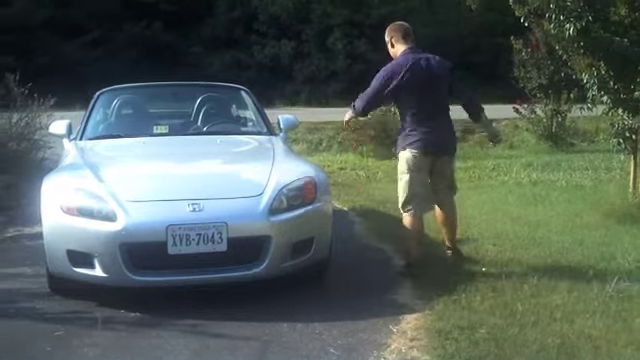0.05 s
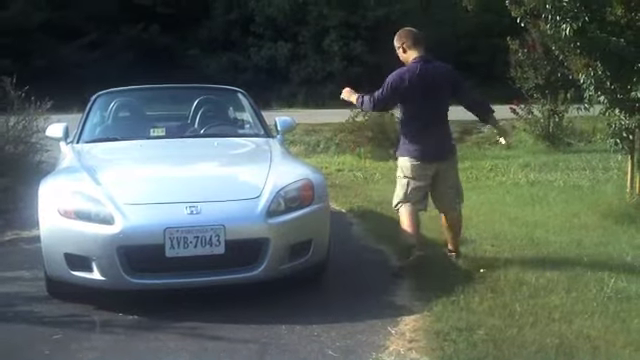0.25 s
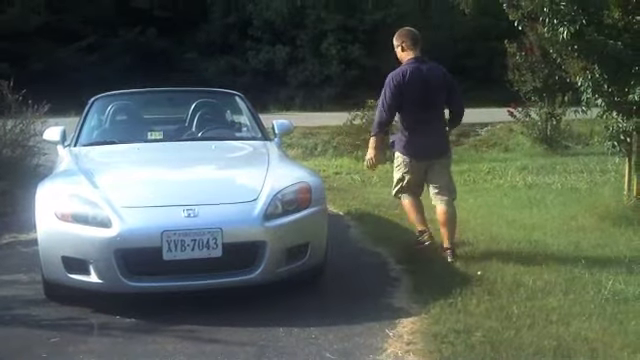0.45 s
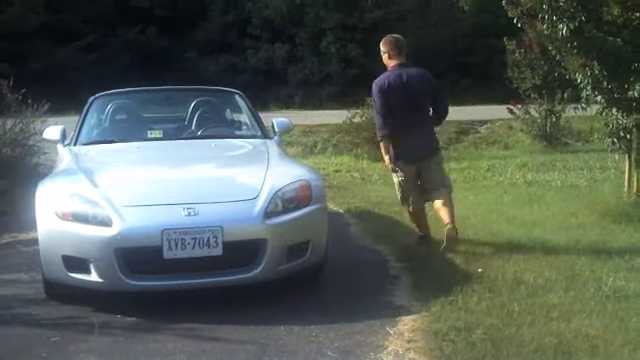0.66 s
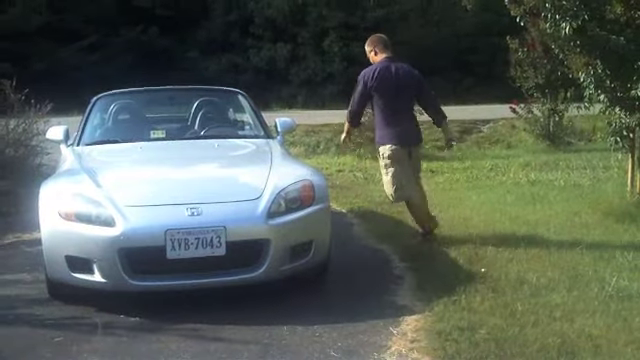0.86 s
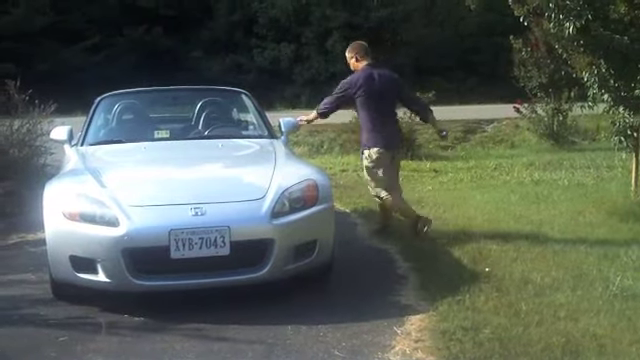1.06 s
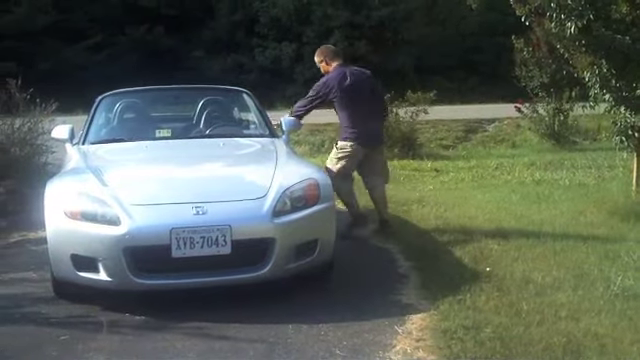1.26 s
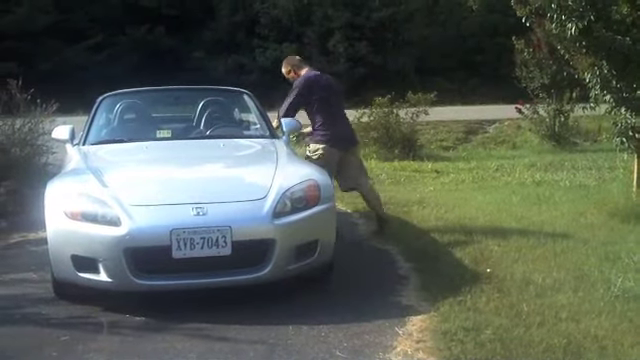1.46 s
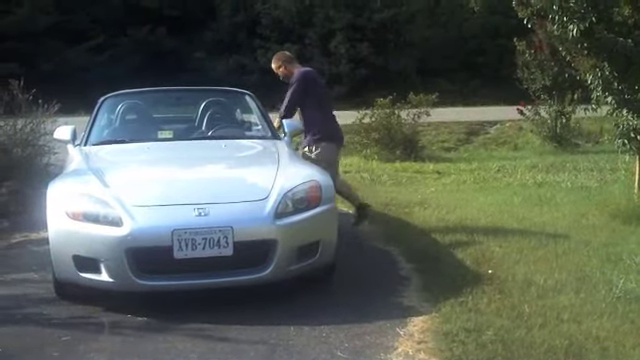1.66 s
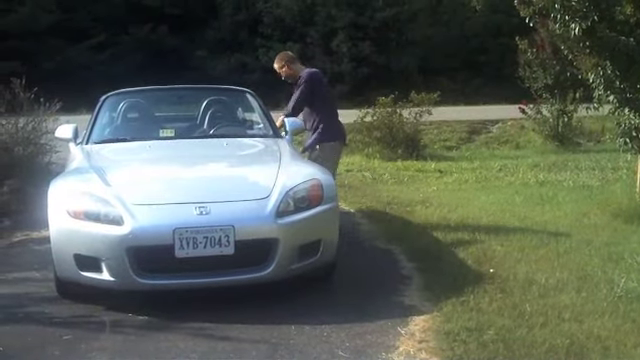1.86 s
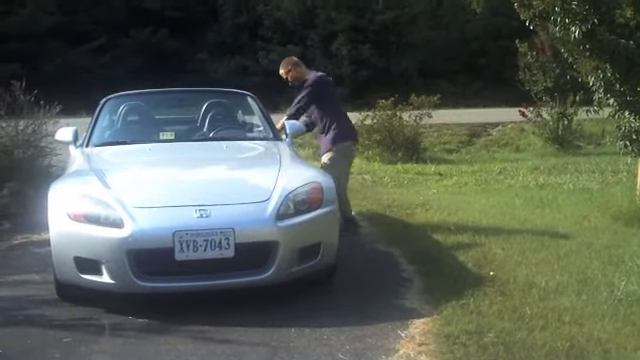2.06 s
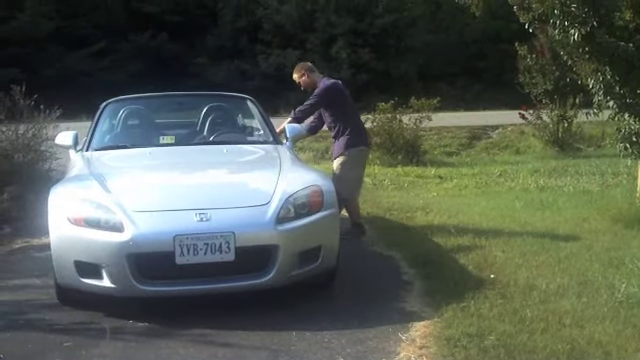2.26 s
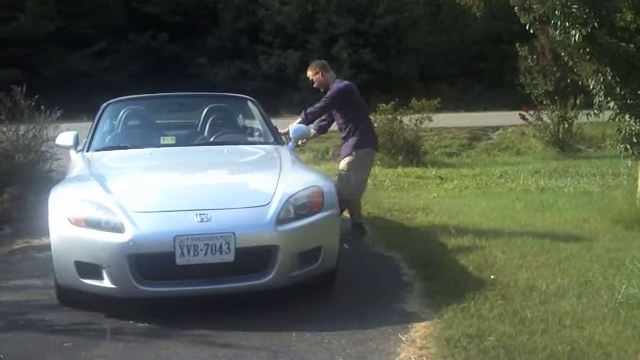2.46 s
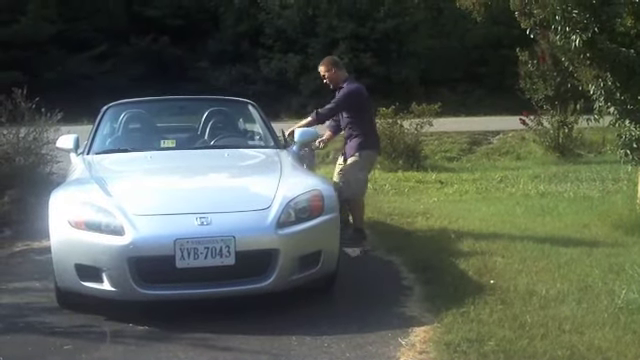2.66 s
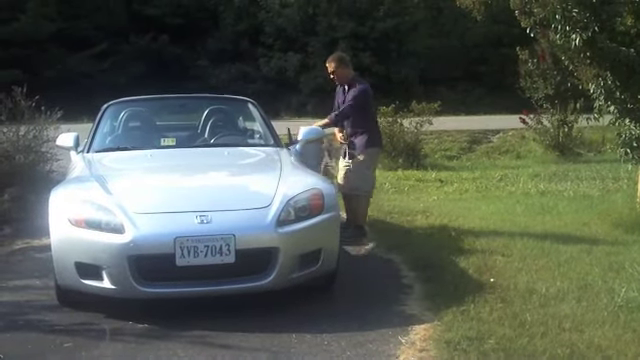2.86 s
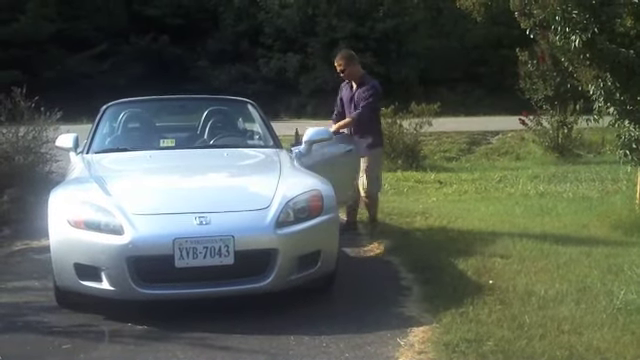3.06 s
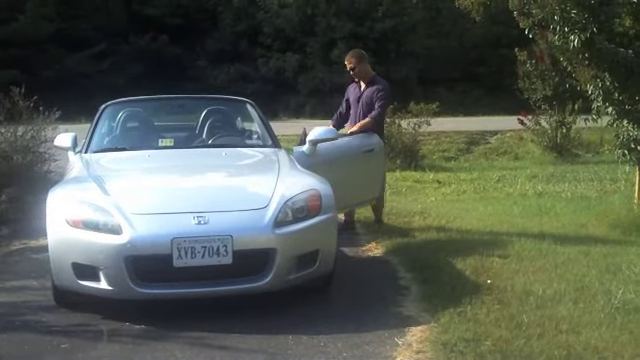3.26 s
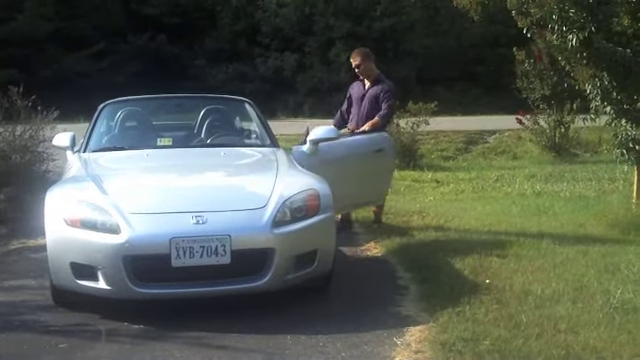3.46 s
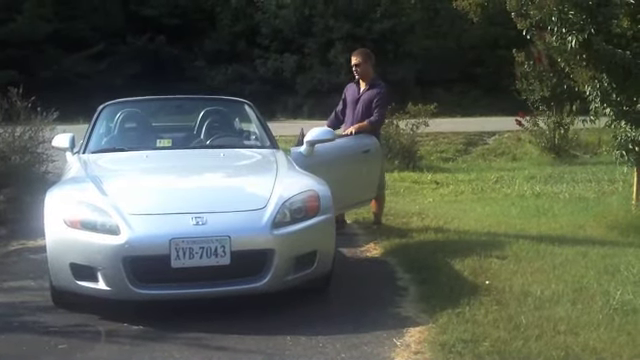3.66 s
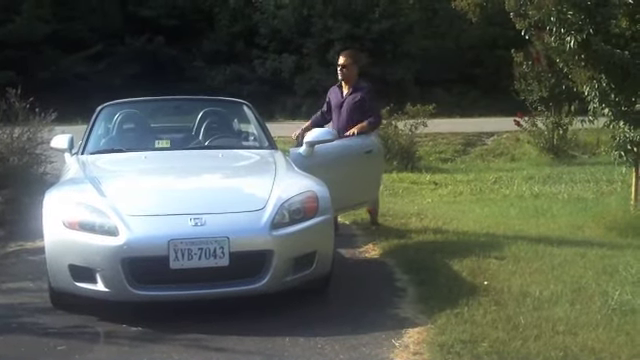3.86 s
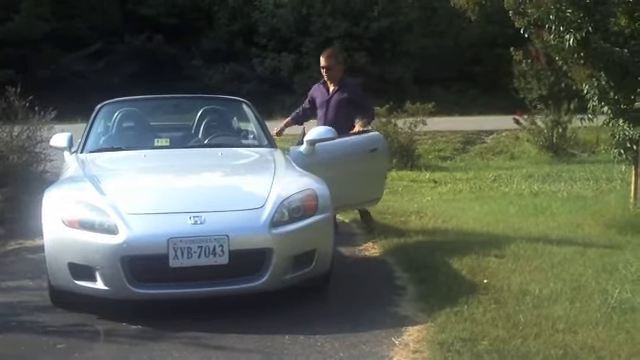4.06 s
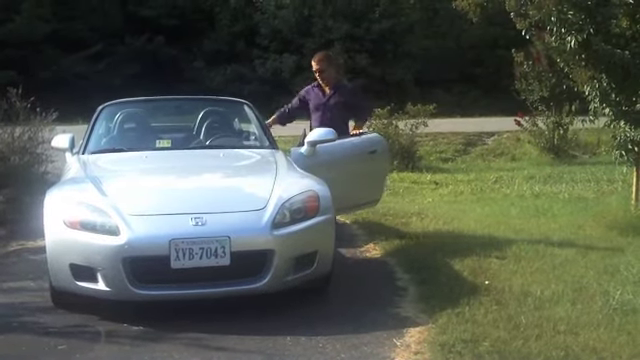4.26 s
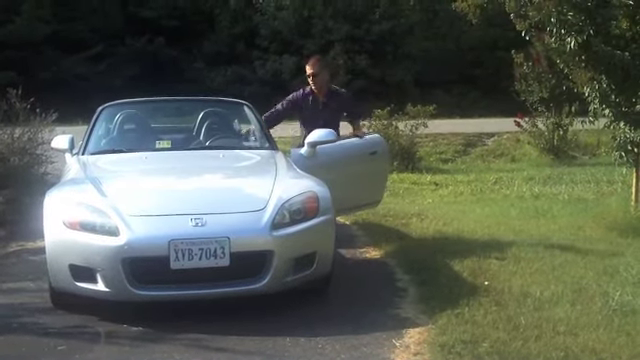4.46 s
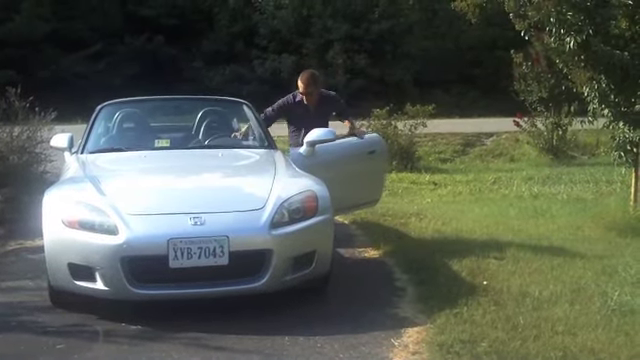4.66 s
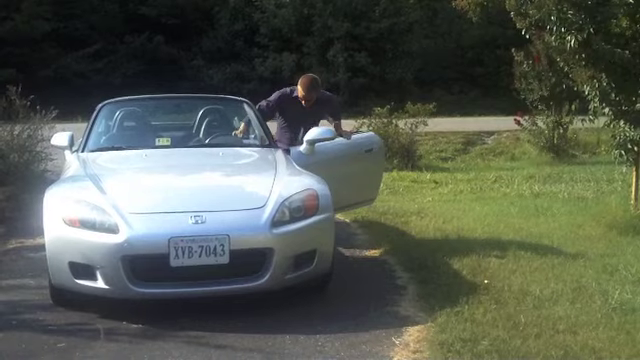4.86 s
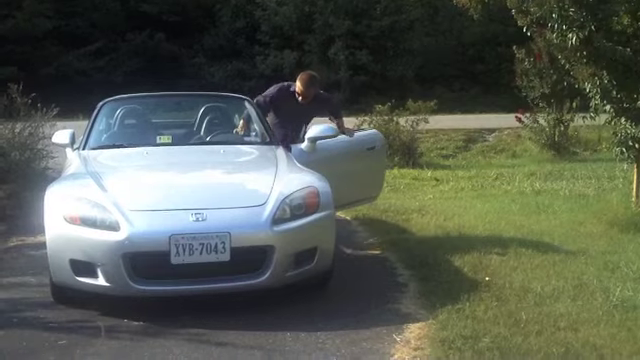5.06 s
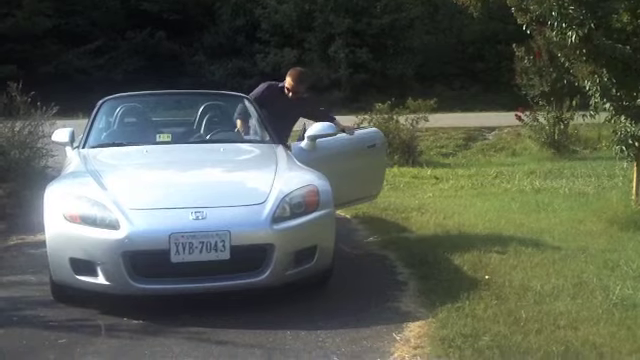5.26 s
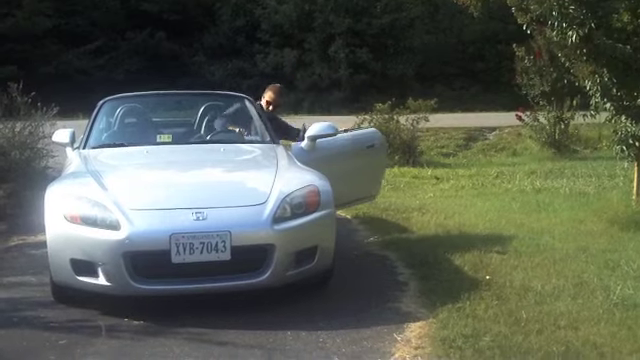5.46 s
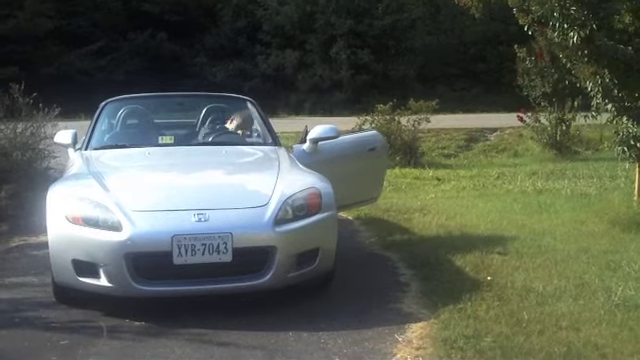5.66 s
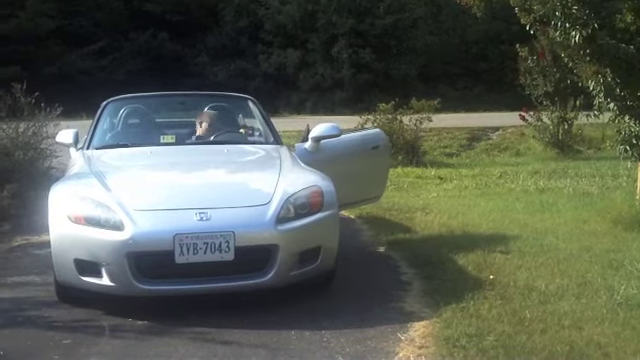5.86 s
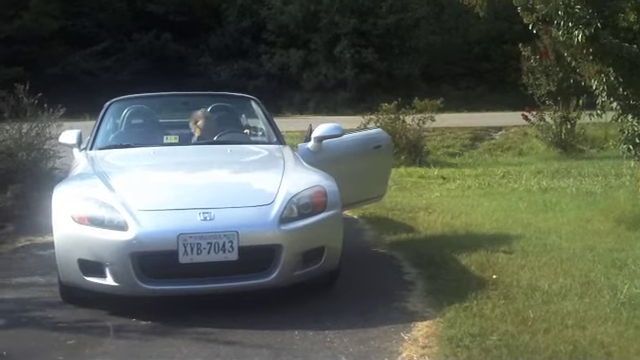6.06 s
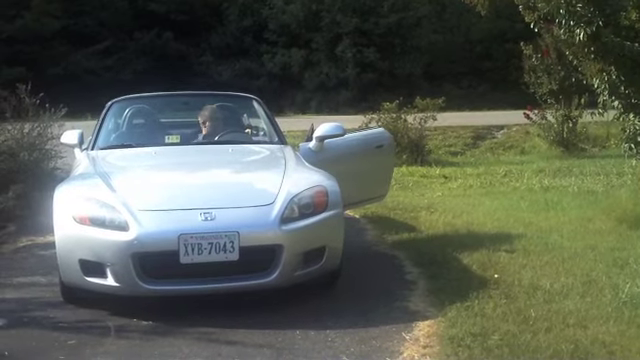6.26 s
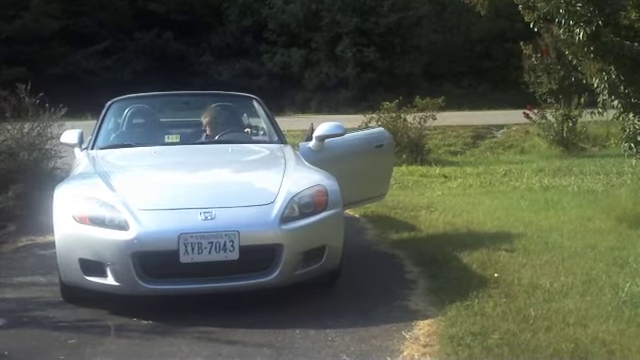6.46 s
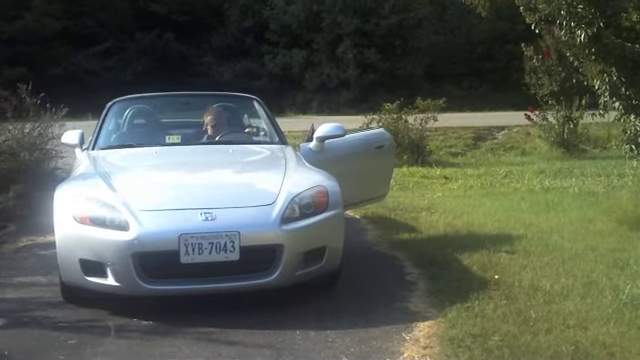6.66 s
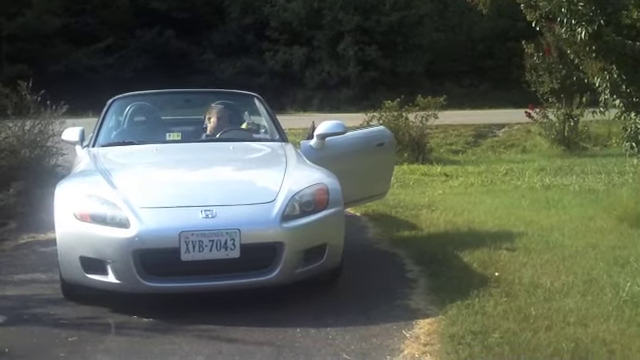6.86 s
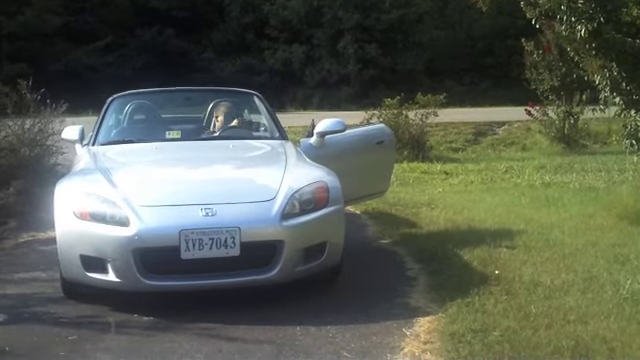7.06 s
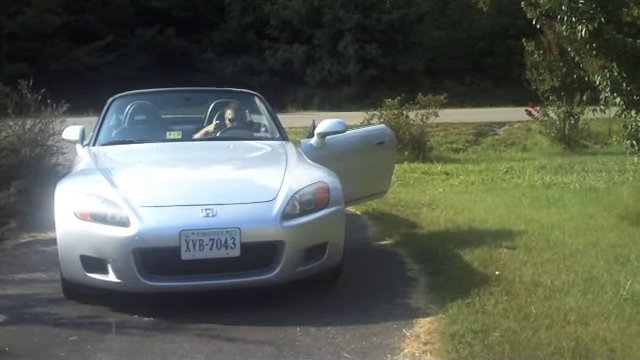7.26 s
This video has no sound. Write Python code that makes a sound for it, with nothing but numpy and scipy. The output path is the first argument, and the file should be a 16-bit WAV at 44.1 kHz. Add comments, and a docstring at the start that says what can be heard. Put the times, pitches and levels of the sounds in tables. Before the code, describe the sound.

Outdoors on a quiet lawn, low breeze and distant traffic rumble with faint grass rustle. Light footsteps scuff, then a dull low thump and scratch at a car, and a soft knock. A nearby bird gives a run of short arched chirps. The door latch lets go with a loud sharp hollow clack and a brief scrape. Later, small knocks, cloth rubs and soft thuds as a man drops into the seat. Small camera microphone, dull and slightly gritty, practically mono.

```python
"""On a lawn beside a parked roadster: breeze and far traffic, a bird calling nearby, a thin whirr far off.
A man walks over the grass, pulls the handle, the latch lets go, the door swings out and he drops into the seat.
Knocks ring the modes of the door shell, rubs are grains of noise, landing weight is a damped low swing and
the bird sings arched notes without a fundamental. One microphone in a small camera hears it all; the camera
samples slowly and holds each value. Faint hiss and low rumble lie opposite in left and right."""
import sys
import numpy as np
from scipy import signal
from scipy.fft import rfft, irfft, next_fast_len
from scipy.io import wavfile
from scipy.ndimage import uniform_filter1d

SR = 44100
rng = np.random.default_rng(int(sys.argv[2]) if len(sys.argv) > 2 else 0)


def master_out(mix):
    """Clip the mix to full scale and print it as 16-bit PCM to the path in sys.argv[1]."""
    frames = np.transpose(np.atleast_2d(mix))
    ceiling = np.clip(frames, -1, 1)
    pcm = np.round(ceiling * 32767).astype(np.int16)
    wavfile.write(sys.argv[1], SR, pcm)


N = 322454
T = np.arange(N) / SR


def undb(db):
    """dB to gain."""
    return 10 ** (np.asarray(db) / 20)


def level(x, db):
    """Scale to an rms level in dB."""
    return x * undb(db) / np.sqrt(np.mean(x ** 2))


def add(out, s, x):
    """Mix x into out from time s in seconds."""
    i = int(s * SR)
    out[i:i + len(x)] += x[:N - i]


def decay(t, t60):
    """Exponential fall by 60 dB in t60 seconds."""
    return 1000 ** (-t / t60)


def ring(x, hz, width_hz):
    """One resonance, gain 1 at its centre."""
    return signal.lfilter(*signal.iirpeak(hz, hz / width_hz, fs=SR), x)


def ring_twice(x, hz, width_hz):
    """The same resonance passed twice, for steeper sides."""
    return ring(ring(x, hz, width_hz), hz, width_hz)


def walk(rate):
    """Random levels held 1 / rate seconds and smoothed twice; spread near 1."""
    hold = int(SR / rate)
    steps = np.repeat(rng.standard_normal(N // hold + 1), hold)
    return 1.3 * uniform_filter1d(uniform_filter1d(steps, hold), hold)[:N]


def bed(spectrum, swell_db, flicker_db):
    """Noise of a given colour in half-octave bands that swell together and flicker alone."""
    size = next_fast_len(N)
    log_hz = np.log(np.arange(size // 2 + 1) * SR / size + 1)
    points = np.array(spectrum)
    colour_db = np.interp(log_hz, np.log(points[:, 0]), points[:, 1], -150, -150)
    colour = rfft(rng.standard_normal(size)) * undb(colour_db)
    out, swell, half_octave = 0, walk(1.5), np.log(2) / 2
    for centre in np.log(14) + half_octave * np.arange(20):
        share = np.clip(1 - abs(log_hz - centre) / half_octave, 0, 1)  # neighbouring bands cross-fade
        band = irfft(colour * share, size)[:N]
        out = out + band * undb(swell_db * swell + flicker_db * walk(9.7))
    return out


# Breeze and far traffic around the lawn. Each row: frequency in Hz, relative density in dB per Hz.
AIR = [(11, -31.5), (18, 0.5), (49, -1.5), (87, -8.5), (198, -16.5), (322, -21.5), (355, -23.5), (391, -21),
       (549, -21.5), (870, -30.5), (1010, -32), (1710, -32.5), (1980, -35.5), (4860, -41), (5900, -41),
       (7670, -81), (13000, -120)]


def air():
    """Breeze and far traffic as one coloured noise, mostly low, swelling a little."""
    return level(bed(AIR, swell_db=.4, flicker_db=1.2), -49)


# Whirrs far off. Each row: middle in seconds, rms level in dB before fading and flutter, pitch in Hz.
WHIRRS = [(.06, -70.5, 2300), (5.17, -70, 1680), (6.2, -71, 2300)]
WHIRR_HOLD_S, WHIRR_FADE_DB_PER_S, WHIRR_WIDTH_HZ = .17, 110, 260


def whirr():
    """A narrow broken band of noise that comes and goes."""
    out, noise = 0, rng.standard_normal(N)
    for s, db, hz in WHIRRS:
        band = level(ring_twice(noise, hz, WHIRR_WIDTH_HZ), db)
        outside_s = np.maximum(abs(T - s) - WHIRR_HOLD_S / 2, 0)
        out = out + band * undb(-WHIRR_FADE_DB_PER_S * outside_s)
    return out * undb(3 * walk(25))


# Calls of the bird nearby. Each row: start in seconds, top of the unheard fundamental in Hz,
# level of the second partial in dB before flutter and echoes.
NOTES = [(2.197, 990, -52), (2.328, 1072, -55), (2.431, 1076, -55), (2.534, 1092, -57), (2.643, 1130, -58),
         (2.756, 1133, -55.5), (3.045, 1035, -60), (3.206, 1050, -64)]
NOTE_S = .048
TOP_AT, RISE, FALL = .47, .18, .27  # top of the arch as share of the note; climb and drop as shares of pitch
THIRD_DB, THIRD_START_DB, THIRD_OPEN_AT = -12, -24, .5  # third partial opens up over this share of the note


def bird():
    """Short arched notes of second and third partial, a little hoarse, blurred by echoes off the trees."""
    out, waver = np.zeros(N), 1 + .02 * walk(300)
    u = np.linspace(0, 1, int(NOTE_S * SR))
    climb = RISE * np.clip(1 - u / TOP_AT, 0, 1) ** 3
    drop = FALL * np.clip((u - TOP_AT) / (1 - TOP_AT), 0, 1) ** 2
    arch = 1 - climb - drop
    third_db = THIRD_START_DB + (THIRD_DB - THIRD_START_DB) * np.minimum(u / THIRD_OPEN_AT, 1)
    loudness = np.sin(np.pi * u ** 1.25) ** .45
    for s, hz, db in NOTES:
        pitch = hz * arch * waver[int(s * SR):][:len(u)]
        phase = 2 * np.pi * np.cumsum(pitch) / SR
        voice = np.sin(2 * phase) + undb(third_db) * np.sin(3 * phase)
        add(out, s, undb(db) * loudness * voice)
    out = out * undb(3 * walk(250))  # hoarse flutter
    trees = rng.standard_normal(SR // 5) * decay(T[:SR // 5], .2)
    echoes = signal.fftconvolve(out, trees / np.linalg.norm(trees))[:N]
    return out + undb(-11) * echoes


# Resonances shared by the small noises around the car. Each row: frequency in Hz, width in Hz,
# level in dB before the tilt.
SCUFF_BODY = [(334.6, 148, 3.5), (960, 490, 13.5), (1410, 120, -0.5), (2683, 340, 7), (4560, 260, -1),
              (5460, 1200, 1)]


def body(x, tilt_db):
    """Steady broad resonances, tilted in dB per octave around 1 kHz."""
    out = 0
    for hz, width_hz, db in SCUFF_BODY:
        gain = undb(db + tilt_db * np.log2(hz / 1000))
        out = out + gain * ring_twice(x, hz, width_hz) / np.sqrt(width_hz)  # evens out the power of the widths
    return out


def stirring(db=-64):
    """Grass, leaves and cloth stir all the time in faint uneven patches."""
    patches = undb(3.5 * walk(30) + 1.5 * walk(4))
    return level(body(rng.standard_normal(N) * patches, -6.0), db)


# Weight landing on ground, sill and seat. Each row: start in seconds, level in dB, pitch in Hz.
THUDS = [(1.447, -31.5, 79), (1.465, -26.5, 44.3), (1.499, -31, 59), (1.57, -32, 52), (2.253, -41, 50),
         (2.35, -37, 122.6), (4.75, -36, 100.4), (4.898, -41.5, 107), (5.637, -34.5, 91.6),
         (5.741, -43.5, 137), (5.99, -42.5, 136), (6.049, -34.5, 59.5), (6.201, -42, 104),
         (6.621, -37.5, 81), (6.971, -42, 125), (7.101, -43, 135)]
THUD_T60_S = .21


def thuds():
    """Dull damped swings, roughened by a little low rumble."""
    out, t = np.zeros(N), T[:SR // 2]
    envelope = (1 - np.exp(-t / 0.0024)) * decay(t, THUD_T60_S)
    for s, db, hz in THUDS:
        rumble = level(ring(rng.standard_normal(len(t)), 2.32 * hz, 0.5 * hz), -12.5)
        swing = np.sin(2 * np.pi * hz * t)
        add(out, s, -undb(db) * (swing + rumble) * envelope)
    return out


# Shoes in grass, cloth, seat and the door seal peeling. Each row: start in seconds, length in seconds,
# rms level in dB, pitch in Hz.
SCUFFS = [(0.255, 0.025, -64, 970), (0.293, 0.035, -61, 980), (0.463, 0.0075, -60.5, 1030),
          (0.682, 0.072, -63.5, 1010), (0.792, 0.029, -59.5, 330), (0.86, 0.0092, -59.5, 970),
          (0.878, 0.012, -63, 1000), (1.085, 0.048, -64.5, 2600), (1.119, 0.045, -60.5, 4900),
          (1.468, 0.032, -47, 1160), (1.47, .032, -61, 5030), (1.483, 0.014, -54.5, 2740),
          (1.55, 0.034, -64.5, 2600), (1.638, .013, -64.5, 5040), (1.647, 0.048, -55, 1060),
          (1.914, 0.015, -49.5, 920), (1.929, 0.026, -53, 1070), (1.96, 0.023, -54.5, 340),
          (2.22, 0.013, -56.5, 1070), (2.392, 0.019, -60.5, 1050), (2.486, 0.0097, -47, 408),
          (2.636, 0.037, -58, 500), (2.69, 0.012, -60, 880), (2.802, 0.033, -56.5, 1080),
          (2.861, 0.052, -52, 1100), (2.892, 0.069, -46.5, 1670), (2.921, 0.023, -61.5, 2200),
          (3.114, 0.017, -52, 411), (3.131, 0.094, -61.5, 1020), (4.501, 0.019, -54.5, 1190),
          (4.517, 0.017, -62, 2670), (4.842, 0.11, -62.5, 1790), (5.097, 0.005, -59, 1890),
          (5.485, 0.058, -62, 600), (5.595, 0.19, -60, 4050), (5.64, 0.011, -52.5, 720),
          (5.726, 0.037, -59, 1380), (5.659, 0.68, -63, 445), (5.801, 0.78, -62.5, 1890),
          (5.892, 0.014, -59, 1520), (5.994, 0.014, -58, 780), (6.095, 0.019, -58, 1000),
          (6.616, 0.054, -60.5, 1000), (6.973, 0.13, -65.5, 2700)]
TILT_DB, TILT_DB_PER_OCTAVE = -6, 2.5  # body tilt (dB per octave) of a 1 kHz rub; higher rubs are brighter
RING_DB, RING_DB_PER_DOUBLING = -1, -2  # own ring of a 15 ms rub against its body; longer rubs ring less


def scuffs(grain_db=1.5):
    """Dense uneven grains under a quick swell; each rub also rings at a pitch of its own."""
    out = np.zeros(N)
    for s, length, db, hz in SCUFFS:
        u = np.linspace(0, 1, int(length * SR) + 2)
        noise, chance = rng.standard_normal((2, SR))[:, :len(u)]
        grains = noise * undb(grain_db * np.repeat(chance, 130)[:len(u)])  # uneven every 3 ms
        grains = grains * undb(2.2 * np.repeat(chance[::-1], 700)[:len(u)])  # long rubs come in clumps
        attack = np.minimum(u * length / (0.00084 + 0.099 * length), 1)
        grains = np.pad(grains * attack * (1 - u ** 3.1), (0, SR // 50))  # room to ring out
        own = ring_twice(grains, hz, 0.22 * hz)
        tilt_db = TILT_DB + TILT_DB_PER_OCTAVE * np.log2(hz / 1000)
        own_db = RING_DB + RING_DB_PER_DOUBLING * np.log2(length / .015)
        rub = level(body(grains, tilt_db), 0) + level(own, own_db)
        add(out, s, level(rub, db))
    return out


# Knocks on the door shell. Each row: start in seconds, level in dB, contact in ms, tilt in dB per octave.
KNOCKS = [(1.636, -25, 1.9, 6.5), (2.8375, -18, 0.37, 2.5), (2.84, -21, 0.11, 1), (2.852, -19.5, 0.38, 0.8),
          (2.901, -58, 0.12, 7.5), (2.922, -53.5, 0.12, 7.5), (4.501, -37.5, 1.26, 6),
          (4.52, -39.5, 0.81, 8), (6.625, -38, 1.9, 4)]
# Modes of the door shell. Each row: frequency in Hz, level in dB before tilt and scatter,
# time to fall 60 dB in seconds.
DOOR = [(121.6, 1, 0.22), (248, 1, 0.087), (316, -7, 0.12), (369.6, -5, 0.096), (430, -14.5, 0.078),
        (448, -17.5, 0.062), (571, -24.5, 0.075), (885, -25, 0.11), (904, 0.5, 0.0079), (940, -7.5, 0.037),
        (1005, -15, 0.1), (1084, 0, 0.034), (1240, -41, 0.047), (1680, -37, 0.032), (2010, -52, 0.024),
        (2600, -42, 0.036), (2660, -33, 0.04), (3230, -24.5, 0.01), (3800, -39, .05), (4140, -15.5, 0.041),
        (5400, -26, 0.056)]
RATTLE_DB, RATTLE_DB_PER_DOUBLING = -19.5, -6.5  # under the knock at 1 ms contact; change as contact doubles


def door():
    """Each knock pushes the shell's modes; a softer contact is longer and leaves the treble out."""
    out, t = np.zeros(N), T[:SR // 3]
    hz, db, t60 = np.transpose(DOOR)[:, :, None]
    side = (-1) ** np.arange(len(DOOR))[:, None]  # neighbouring modes start in opposite directions
    swings = np.sin(2 * np.pi * hz * t) * decay(t, t60)
    for s, blow_db, ms, tilt_db in KNOCKS:
        contact = t[:SR // 50] / ms
        push = contact ** 2 * np.exp(-6000 * contact)
        # a knock near a stiff edge moves the big low modes less
        scatter_db = 0.55 * rng.standard_normal(hz.shape)
        gain = side * undb(db + tilt_db * np.log2(hz / 400) + scatter_db)
        modes = (gain * swings).sum(0)
        add(out, s, undb(blow_db) * np.convolve(modes, push / push.sum()))
        # loose rods and trim rattle for a moment, more after a hard contact
        rattle_db = blow_db + RATTLE_DB + RATTLE_DB_PER_DOUBLING * np.log2(ms)
        rattle = level(body(rng.standard_normal(len(t)), 0.12), rattle_db)
        add(out, s, rattle * (decay(t, 0.017) + 0.25 * decay(t, 0.097)))
    return out


def scene():
    """One microphone hears it all, so both channels are alike."""
    mono = door() + scuffs() + thuds() + stirring() + bird() + whirr() + air()
    return np.array([mono, mono])


# Faint hiss and low rumble, opposite in left and right. Each row: frequency in Hz,
# relative density in dB per Hz.
SIDE_NOISE = [(18, 2), (60, 6), (250, -31), (600, -47), (1000, -30.5), (2000, -20.5), (5300, -22.5),
              (5900, -44), (6600, -26), (8000, -28.5), (8600, -48)]
# Constant offset of the outputs, left then right, as a share of full scale.
OFFSET = (-.0305, .0283)
GUARD_HZ, TOP_HZ = 5750, 15150  # low-pass before the slow sampling; final top cut


def record(dry):
    """Values taken 12000 times a second and held in steps leave mirror images either side of 12 kHz."""
    guard = signal.butter(10, GUARD_HZ, fs=SR, output="sos")
    guarded = signal.sosfiltfilt(guard, dry)
    slow = signal.resample_poly(guarded, 40, 147, axis=1)  # 44100 to 12000 Hz
    steps = np.repeat(slow, 4, axis=1)  # held at 48000 Hz
    held = signal.resample_poly(steps, 147, 160, axis=1)  # back to 44100 Hz
    held = np.pad(held, ((0, 0), (0, 8)))[:, 5:N + 5]  # undo the delay of holding
    side_noise = level(bed(SIDE_NOISE, swell_db=1.5, flicker_db=3), -72)
    held = held + side_noise * np.array([[1], [-1]])
    top_cut = signal.ellip(8, .1, 50, TOP_HZ, fs=SR, output="sos")
    return signal.sosfiltfilt(top_cut, held) + np.array(OFFSET)[:, None]


dry = scene()
out = record(dry)
master_out(out)
```